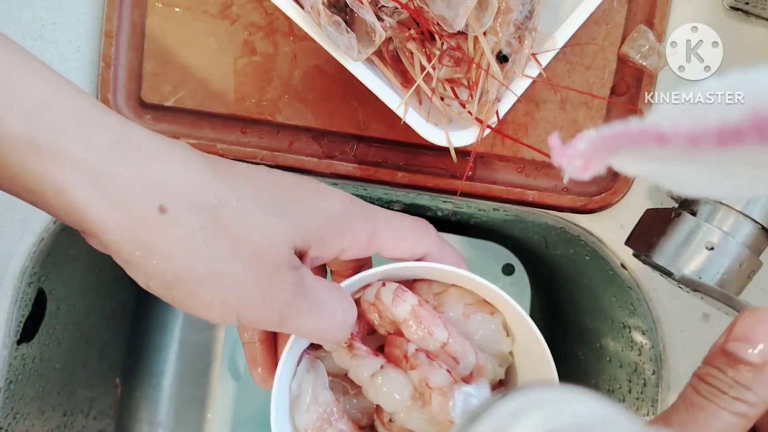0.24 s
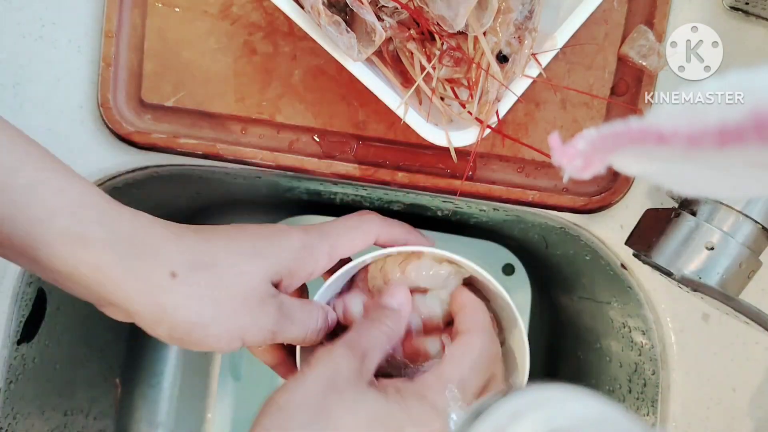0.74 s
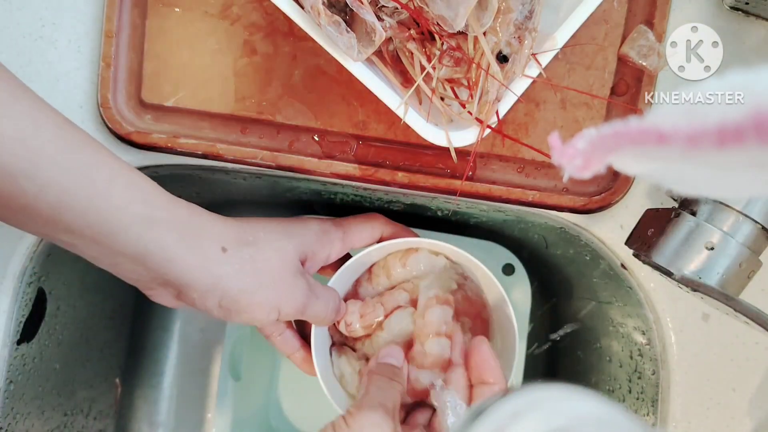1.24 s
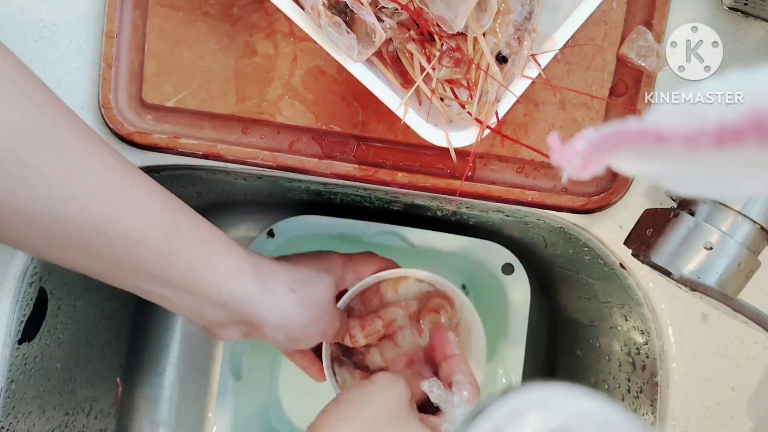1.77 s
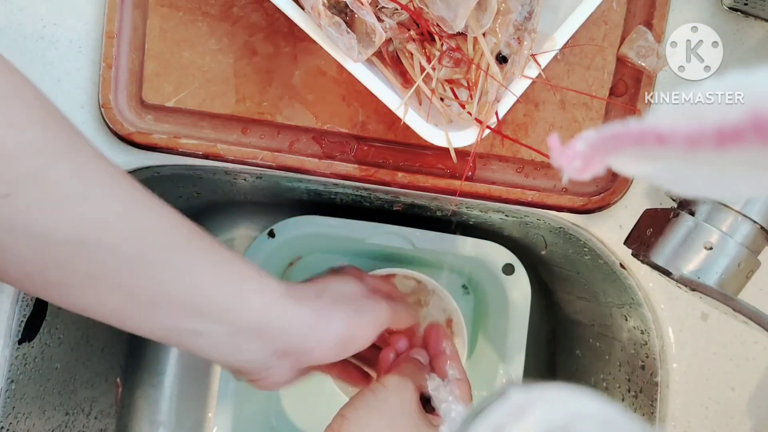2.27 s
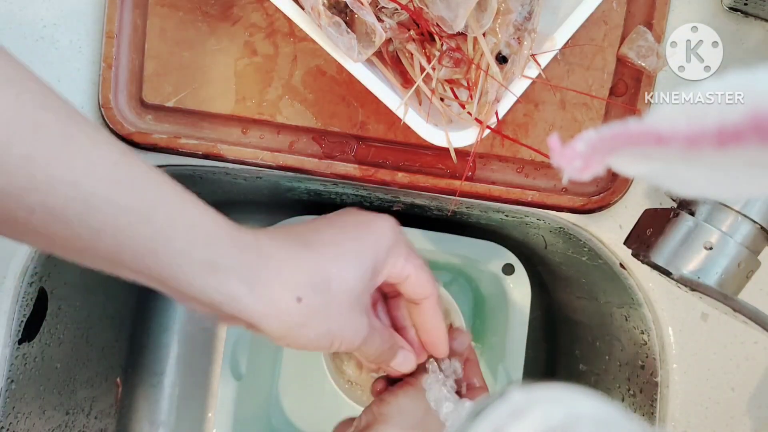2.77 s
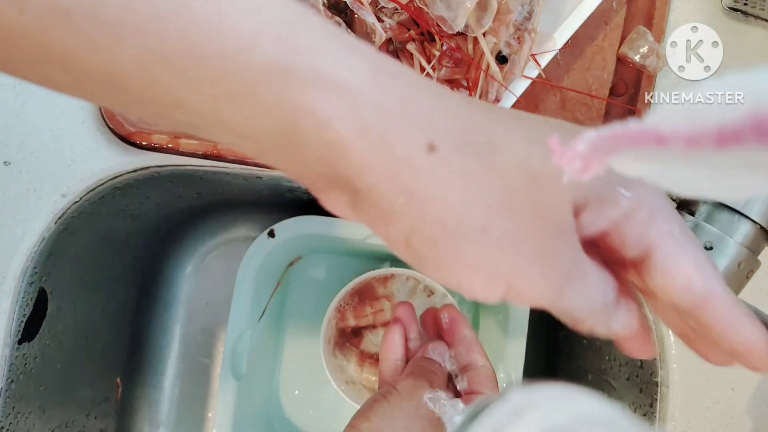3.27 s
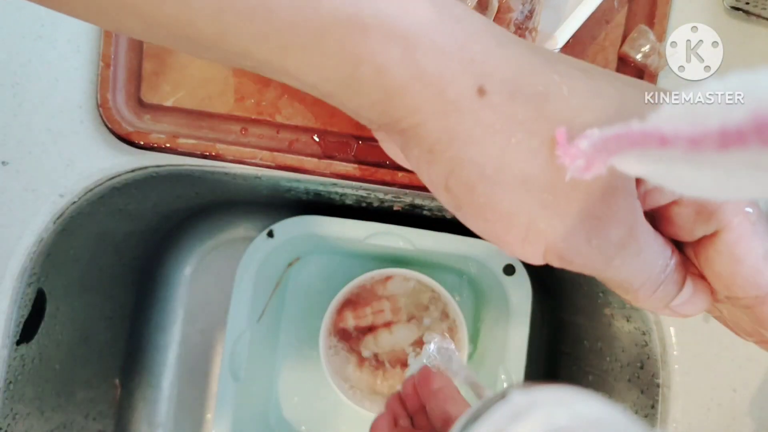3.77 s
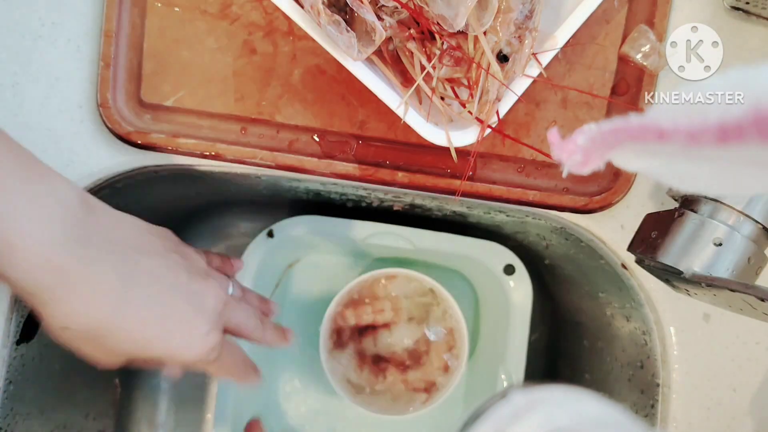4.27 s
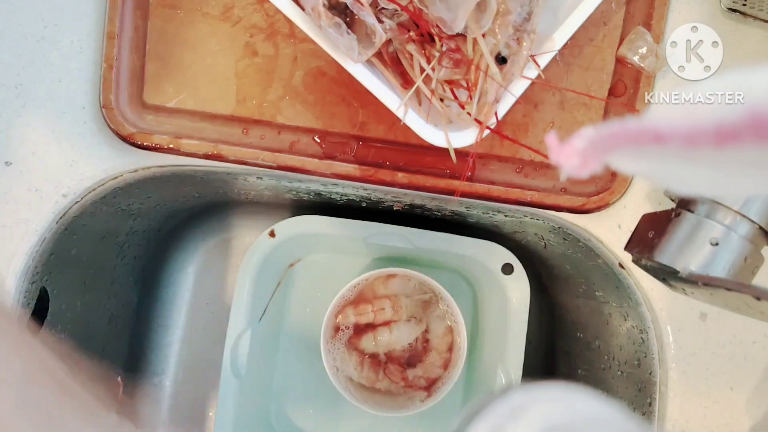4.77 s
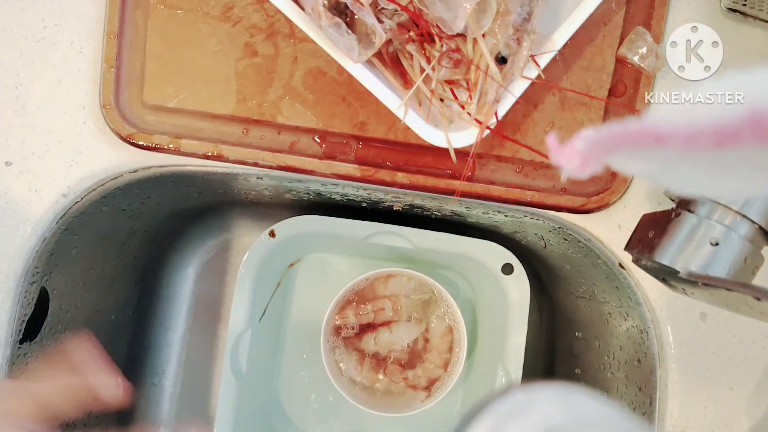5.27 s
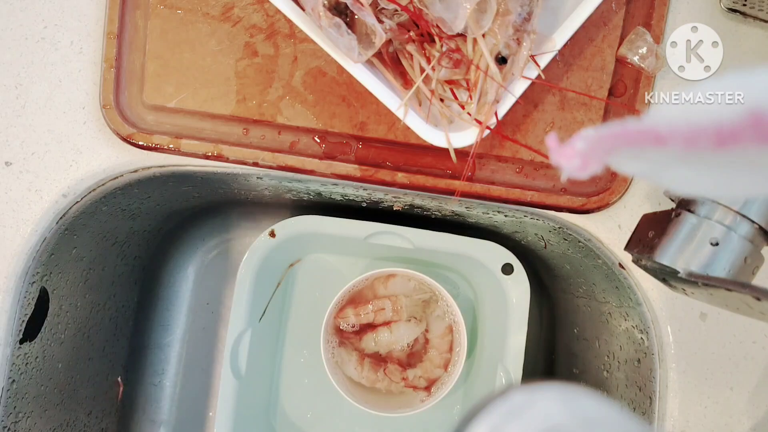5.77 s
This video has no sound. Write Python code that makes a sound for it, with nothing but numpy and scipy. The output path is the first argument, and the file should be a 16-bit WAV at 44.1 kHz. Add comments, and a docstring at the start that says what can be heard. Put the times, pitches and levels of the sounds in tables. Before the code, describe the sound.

A kitchen sink is heard close up in stereo, with a low room hum behind. At about 0.2 seconds come two soft knocks, the first with a hollow ring. From 0.5 seconds a tap runs over hands and a bowl: a broken, uneven hiss, slightly to the left, with fizzing bubbles and sharp little splashes. Between 2.1 and 2.4 seconds the bowl knocks and rocks on a plastic tub, a cluster of low, drumming blows that is the loudest moment. The water keeps splashing, with lighter bumps and a few bubbly plinks around 4 seconds, and dies away between 4.2 and 4.4 seconds. Two more light knocks follow. Wet hands are shaken off, flinging short showers of drops into the sink at about 4.5, 5.1 and 5.5 seconds. A soft knock at 5.8 seconds and a few faint drips end it.

```python
"""A kitchen sink, close up on a stereo pair, with the low hum of the room behind. A glug of air and two soft
knocks; then the tap runs over hands and a bowl in a plastic tub in the steel sink. The broken jet hisses, small
bubbles fizz and splashes ring their trapped air. The bowl knocks and rocks on the tub, which drums low, hardest
just after two seconds. The tap is shut a little after four seconds; wet hands are shaken off and a few drops
fall."""
import sys
import numpy as np
from scipy import signal
from scipy.fft import rfft, irfft, next_fast_len
from scipy.io import wavfile

SR = 44100
rng = np.random.default_rng(int(sys.argv[2]) if len(sys.argv) > 2 else 0)


def file_out(sig):
    """Save sig as 16-bit WAV at sys.argv[1]."""
    # one column per channel
    cols = np.atleast_2d(sig).T
    # limit, then scale
    lim = np.clip(cols, -1, 1)
    pcm = np.round(lim * 32767).astype(np.int16)
    wavfile.write(sys.argv[1], SR, pcm)


N = 266174

# strength of the stream as hands and bowl move through it: time_s, level_db
STREAM_FLOW = [(0.421, -79.5), (0.57, -43.5), (0.65, -44.5), (0.76, -37.5), (0.8, -40.5), (1.06, -55.5),
               (1.1, -46), (1.149, -51.5), (1.4, -37.5), (1.5, -40.5), (1.59, -33), (1.86, -38.5),
               (1.93, -43), (2.0, -36.5), (2.649, -37.5), (2.75, -51), (2.775, -37), (2.87, -35),
               (2.96, -36.5), (3.0, -40.5), (3.15, -37.5), (3.19, -45.5), (3.32, -40.5), (3.374, -48.5),
               (3.386, -36.5), (3.44, -33), (3.65, -37), (3.72, -30.5), (3.816, -45), (3.84, -31.5),
               (3.92, -34.5), (4.01, -33.5), (4.107, -40.5), (4.13, -29), (4.156, -46), (4.27, -53.5),
               (4.422, -53)]
# tone colour of the spray and its bubbles: frequency_hz, level_db
SPRAY_SPECTRUM = [(1000, -14.5), (1500, -11), (2300, -2), (3700, -5), (5300, 1), (7700, 2), (9200, -18),
                  (11000, -9.5), (15800, -12.5)]


def amp(db):
    """Decibels to gain."""
    return 10 ** (np.asarray(db) / 20)


def unit_rms(x):
    """Scale to unit rms."""
    return x / np.sqrt(np.mean(x ** 2) + 1e-20)


def at_hz(points, hz):
    """Read a table of frequency_hz, value on a log-frequency axis."""
    frequencies, values = np.transpose(points)
    return np.interp(np.log(hz), np.log(frequencies), values)


def spectrum_rms(spectrum, low_hz):
    """Rms of unit white noise shaped by a spectrum, from low_hz to 15 kHz."""
    return np.sqrt(np.sum(amp(2 * at_hz(spectrum, np.arange(low_hz, 15000, 10))) * 20 / SR))


def drift(rate_hz):
    """Random wander of unit rms, smooth above rate_hz."""
    pole = np.exp(-80 * np.pi * rate_hz / SR)
    slow = signal.lfilter([1], [1, -2 * pole, pole * pole], rng.standard_normal(N // 40 + 2002))[2000:]
    return np.interp(np.arange(N) / 40, np.arange(len(slow)), unit_rms(slow))


def ring(clicks, hz, t60_s):
    """A unit click sets a sine of height 1 ringing."""
    r, w = amp(-60 / (t60_s * SR)), 2 * np.pi * hz / SR
    return signal.lfilter([0, np.sin(w)], [1, -2 * r * np.cos(w), r * r], clicks + 1e-18)


def filtered(x, kind, hz):
    """A gentle Butterworth filter."""
    return signal.sosfilt(signal.butter(2, hz, kind, fs=SR, output="sos"), x)


def stereo_bands(noise):
    """Split noise (2 draws, mid and side, samples) into third octaves: yields centre Hz, stereo band."""
    # how alike the two microphones hear the noise: frequency_hz, correlation
    likeness = [(40, 1), (125, 0.95), (300, 0.58), (700, 0.024), (8000, 0.012)]
    edges = 35 * 2 ** (np.arange(28) / 3)
    for k, (low, high) in enumerate(zip(edges, edges[1:])):
        mid, side = filtered(noise[k % 2], "band", [low, high])
        hz = np.sqrt(low * high)
        alike = at_hz(likeness, hz)
        yield hz, np.sqrt(1 + alike) * mid + np.sqrt(1 - alike) * side * [[1], [-1]]


def gurgle_share(hz):
    """How far a pitch follows the gurgle: not at all above 4.5 kHz, fully an octave lower."""
    return np.clip(np.log2(4500 / hz), 0, 1)


def add(out, start_s, sound):
    """Mix a sound in at start_s."""
    i = round(start_s * SR)
    out[..., i:i + sound.shape[-1]] += sound[..., :out.shape[-1] - i]


def room_hum(patchy_db):
    """Room tone: a low rumble and a faint hiss, each band wavering by itself."""
    # tone colour of the room: frequency_hz, level_db
    spectrum = [(50, -54.5), (85, 2.5), (155, -4), (270, -0.5), (400, -10), (620, -8.5), (1150, -15.5),
                (2700, -27), (7800, -39.5), (9000, -60), (15800, -44)]
    bands = stereo_bands(rng.standard_normal((2, 2, N)))
    return unit_rms(sum(band * amp(at_hz(spectrum, hz) + patchy_db * drift(26)) for hz, band in bands))


def kitchen_walls(x, t60_s=0.18, wall_cut_hz=3700):
    """Near walls return the sound: eight echo loops to each microphone, duller on every round."""
    size = next_fast_len(N + SR)
    hz = np.arange(size // 2 + 1) * SR / size
    spectrum, out = rfft(x, size), np.zeros((2, N))
    for k, lag_s in enumerate(rng.uniform(0.0053, 0.033, 16)):
        loop = amp(-60 * lag_s / t60_s) / (1 + 1j * hz / wall_cut_hz) * np.exp(-2j * np.pi * hz * lag_s)
        out[k % 2] += irfft(spectrum * loop / (1 - loop), size)[:N] * (-1) ** (k // 2)
    return out


def shaken_hands(grain_db, onset_s=0.0083, first_drops_db=-3):
    """Drops flung into the sink: grainy broad noise that starts at once, swells and dies."""
    # showers of drops: start_s, peak_db, swell_s, t60_s, tilt_db_per_octave
    showers = [(4.452, -35.5, 0.067, 0.16, -2.2), (5.052, -29.5, 0.034, 0.16, -1.5),
               (5.395, -52, 0.0066, 0.78, -5.5), (5.488, -38, 0.0069, 0.21, -1.5),
               (5.6, -59, 0.12, 0.15, -3.5), (5.77, -48.5, 0.0043, 0.17, -8.5),
               (5.984, -55, 0.0077, 0.25, -3.5)]
    # tone colour of a shower before its tilt: frequency_hz, level_db
    spectrum = [(200, -18), (1100, -5.5), (2500, -8), (7200, -5.5), (9000, -10), (15800, -16.5)]
    t, envelopes, out = np.arange(N) / SR, [], 0
    for start_s, peak_db, swell_s, t60_s, tilt_db in showers:
        age = t - start_s
        swell_db = first_drops_db * np.clip(1 - age / swell_s, 0, 1)
        fall_db = 60 * np.maximum(age - swell_s, 0) / t60_s
        envelopes.append((np.clip(age / onset_s, 0, 1) ** 2 * amp(peak_db + swell_db - fall_db), tilt_db))
    for hz, band in stereo_bands(rng.standard_normal((2, 2, N)) * amp(grain_db * drift(250))):
        octaves = np.log2(max(hz, 400) / 3000)
        level = sum(envelope * amp(tilt_db * octaves) for envelope, tilt_db in envelopes)
        out += band * amp(at_hz(spectrum, hz)) * level
    return out / spectrum_rms(spectrum, 300)


def tub_and_sink(water, stifled_t60_s, rattle, sway):
    """Falling water and the bowl's blows ring the same modes; blows also thud and clack. Mid and side."""
    # blows on tub and sink: start_s, boom_db, drum_db, clack_db
    knocks = [(0.205, -43.5, -37, -70), (0.269, -37.5, -70, -75), (2.132, -10.5, -18.5, -16.5),
              (2.159, -18, -14.5, -38), (2.189, -22.5, -25.5, -19), (2.332, -21.5, -12, -19.5),
              (2.398, -32, -20, -40), (3.392, -51, -38.5, -45.5), (3.645, -48, -44, -36),
              (3.964, -39.5, -22.5, -49), (4.02, -38.5, -28, -67), (4.099, -47, -31, -75),
              (4.198, -38, -32.5, -66), (4.22, -41, -33.5, -53), (4.294, -40.5, -32, -56),
              (4.332, -48, -35.5, -51.5), (4.47, -40, -32, -34), (4.498, -40.5, -29, -46),
              (5.777, -37, -42.5, -62)]
    # where the three parts of a blow lie: boom_hz, drum_hz, clack_hz
    blow_hz = (155, 275, 1000)
    # modes of tub and sink: pitch_hz, mid_db, side_db, t60_s, gain_db_per_db of drum over boom
    modes = [(155, 0, -22, .6, 0), (274, 0, -16, .6, 0), (195, -8, -25, .15, -0.3),
             (351, -10, -18, .2, 0.1), (427, -10, -16, .15, 0.4), (520, -17, -6, .12, 0.4),
             (765, -6, -14, .11, 0.5), (930, -3, -8, .08, -0.6), (1140, -8, -3, .08, 0.3),
             (1250, -1, -3, .07, -0.1)]
    wet_share = 0.35   # share of the ring time left under falling water
    light_db, light_t60_s = -30.5, 0.074   # light blows are smothered sooner
    force, out = water * rng.standard_normal(N), np.zeros((2, N))
    for hz, mid_db, _, t60_s, _ in modes:
        out[0] += amp(mid_db) * min(1, 275 / hz) ** 2.2 * ring(force, hz, wet_share * t60_s)
    hz, mid_db, side_db, t60_s, drum_gain = np.transpose(modes)[:, :, None]
    facing = amp(np.hstack([mid_db, side_db]).T)
    facing[1, ::2] *= -1   # neighbouring modes lean to opposite sides
    t = np.arange(SR // 2) / SR
    swell = 1 - np.exp(-t * hz / 0.87)   # the walls take about a cycle to come into swing
    # the loose bowl roughens the modes, the upper ones most
    roughness = rng.standard_normal((len(knocks), len(modes), 64)) * np.where(hz > 300, rattle, sway)
    gaps_s = np.diff([row[0] for row in knocks], append=N / SR)
    free_times_s = np.minimum(0.043, 0.76 * gaps_s)   # a blow rings freely until contact stifles it
    for (start_s, *blow_db), free_s, rough in zip(knocks, free_times_s, roughness):
        boom_db, drum_db, clack_db = blow_db
        start_db = np.interp(np.log(hz), np.log(blow_hz), blow_db)
        start_db += drum_gain * np.clip(drum_db - boom_db, -10, 10)
        contact_t60_s = stifled_t60_s if max(blow_db) > light_db else light_t60_s
        fall_db = 60 * t / t60_s + 60 * np.maximum(t - free_s, 0) / contact_t60_s
        flutter = 1 + np.array([np.interp(t * 125, np.arange(64), row) for row in rough])
        ringing = amp(start_db - fall_db) * swell * flutter * np.sin(2 * np.pi * hz * t)
        burst = rng.standard_normal((2, len(t))) * (np.exp(-t / 0.0051) + 0.24 * np.exp(-t / 0.045))
        clack = amp(clack_db + 6.5) * filtered(burst, "band", [800, 3000])
        dull_noise = unit_rms(filtered(rng.standard_normal(len(t)), "band", [190, 560]))
        thud = amp(max(blow_db) - 16.5) * dull_noise * np.exp(-t / 0.047)
        add(out, start_s, facing @ ringing + thud * [[1], [0]] + clack)
    return out


def short_rings(cycles, rise, wobble):
    """Short pitched rings: each is a dying sine that climbs a little while its level wobbles."""
    # big bubbles, drops and glugs of air in the pipe: start_s, level_db, pitch_hz
    rings = [(0.202, -32, 394.5), (1.785, -33.5, 1440), (3.253, -33.5, 929), (3.309, -41.5, 915),
             (3.334, -40.5, 965), (4.05, -27.5, 1050), (4.083, -23, 1986), (5.072, -27, 1072),
             (5.785, -31, 616), (5.9, -42.5, 2500)]
    out, t = np.zeros(N), np.arange(round(0.15 * SR)) / SR
    for (start_s, level_db, hz), chance in zip(rings, rng.standard_normal((len(rings), 32))):
        flutter = 1 + wobble * np.interp(t * 200, np.arange(32), chance)
        envelope = amp(level_db - 60 * t * hz / cycles) * np.minimum(t / 0.0013, 1)
        add(out, start_s, envelope * flutter * np.sin(2 * np.pi * hz * t * (1 + rise * t)))
    return out


def fizz(gurgle_db, per_s, cycles, clump_db):
    """Small bubbles ring some cycles each; those of like size are born in clumps."""
    strengths = amp(4.2 * np.minimum(rng.exponential(1, N), 4.5)) * rng.choice([-1, 1], N)
    dice, size_class, out = rng.random(N), rng.integers(0, 30, N), 0
    clumps = [amp(clump_db * drift(15)) for _ in range(10)]
    for k, hz in enumerate(np.geomspace(1300, 11000, 30)):
        born = (size_class == k) * (dice < per_s * clumps[k // 3] / SR)
        level_db = gurgle_share(hz) * gurgle_db + at_hz(SPRAY_SPECTRUM, hz) + 4.1 * np.log2(hz / 5000)
        out += amp(level_db) * ring(strengths * born, hz, cycles / hz)
    return unit_rms(out)


def stray_splashes(flow_db, per_s=70, trickle_db=-50):
    """A stream above a trickle throws lesser splashes at random: rows of start_s, peak_db, pitch_hz."""
    open_s, shut_s = STREAM_FLOW[0][0], STREAM_FLOW[-1][0]
    when, size, pitch = rng.random((round(per_s * (shut_s - open_s)), 3)).T
    start_s = open_s + (shut_s - open_s) * when
    around_db = flow_db[(start_s * SR).astype(int)]
    peak_db = around_db + 9.5 - 2.5 * np.log(size + 0.08)
    return np.transpose([start_s, peak_db, 2700 * 4 ** pitch])[around_db > trickle_db]


def splashes(flow_db, spatter_s, tail_s, cycles):
    """Each splash: uneven ticks, a hissing tail, an air pocket that rings and a bubble that chirps."""
    # hard splashes and their trapped air: start_s, peak_db, pitch_hz
    hard = [(0.5686, -22.5, 7840), (0.6809, -28.5, 3323), (0.6945, -20, 5260), (0.7262, -25, 3660),
            (0.7725, -17.5, 2640), (0.8568, -25.5, 2670), (1.088, -31, 5300), (1.3848, -15.5, 5690),
            (1.472, -24, 2637), (1.5663, -21.5, 2665), (1.5906, -14.5, 5600), (1.6851, -27, 2320),
            (1.709, -18.5, 5275), (1.763, -22.5, 9900), (1.8027, -13.5, 5400), (1.845, -23, 5240),
            (1.981, -22, 2395), (2.1947, -15.5, 4950), (2.4938, -24.5, 2760), (2.6016, -16.5, 7300),
            (3.0654, -19, 2075), (3.0898, -20, 2380), (3.2872, -21, 5840), (3.3827, -33, 6000),
            (3.457, -18.5, 4330), (3.5398, -17.5, 5100), (3.6458, -19.5, 2980), (3.716, -21.5, 2420),
            (3.9363, -12, 5760), (3.9998, -18, 3060), (4.05, -24, 3080), (4.087, -17, 6900),
            (4.1303, -18.5, 2350), (4.189, -21.5, 10900), (4.2886, -24.5, 6480), (4.346, -35, 7100),
            (5.4116, -39, 2300), (5.5194, -32, 5600)]
    out, t = np.zeros(N), np.arange(round(0.12 * SR)) / SR
    for k, (start_s, peak_db, hz) in enumerate([*hard, *stray_splashes(flow_db)]):
        top_hz = min(hz * (4.0 if k < len(hard) else 2.2), 16000)   # strays are duller
        ticks = np.repeat(rng.random(len(t) // 20 + 1) ** 2, 20)[:len(t)]   # about 0.5 ms a droplet
        ticks[:20] = 1.6   # the first droplet lands hardest
        pace = t * np.sqrt(hz / 5000)   # small splashes are over sooner
        envelope = ticks * np.exp(-pace / spatter_s) + 0.22 * np.exp(-pace / tail_s)
        burst = rng.standard_normal(len(t)) * envelope
        pocket = ring(burst * hz / 20000, hz, cycles / hz)
        chirp = amp(-60 * t * hz / (2 * cycles)) * np.sin(2 * np.pi * 1.24 * hz * t * (1 + 14 * t))
        droplets = filtered(0.37 * burst + pocket, "band", [0.68 * hz, top_hz])   # all of like size
        sound = droplets + 0.1 * burst + 0.12 * chirp
        add(out, start_s, amp(peak_db) * sound / np.abs(sound).max())
    return out


def spray(flow_db, gurgle_db, patchy_db, spatter_db, full_flow_db=-27.5, mist_hz=9000):
    """The broken jet hisses: like droplets come in quick volleys; lower bands swell with the gurgle."""
    # how much louder the jet is at the left microphone: frequency_hz, level_db
    left_bias = [(1000, -5.5), (2500, -2), (5000, 6), (9000, -0.5)]
    mist_db = 0.34 * np.clip(full_flow_db - flow_db, -5, 15)   # fine mist follows the flow only in part
    octave_volleys = [unit_rms(amp(spatter_db * np.clip(drift(110), 0, 3) ** 1.5)) for _ in range(9)]
    out = 0
    for k, (hz, band) in enumerate(stereo_bands(rng.standard_normal((2, 2, N)))):
        level_db = at_hz(SPRAY_SPECTRUM, hz) + gurgle_share(hz) * gurgle_db + (hz > mist_hz) * mist_db
        pan_db = at_hz(left_bias, hz) / 2 * np.array([[1], [-1]])
        out += band * octave_volleys[k // 3] * amp(level_db + pan_db + patchy_db * drift(11.6))
    return out / spectrum_rms(SPRAY_SPECTRUM, 4000)


def scene():
    """Stream, tub, drops and room, placed between the two microphones."""
    # gurgle against the spray: time_s, level_db
    gurgle = [(0.5, 13), (0.6, -5.5), (0.85, 5.5), (1.5, 0.5), (2.9, -4), (3.7, -5), (4.12, 5.5),
              (4.18, -30)]
    t = np.arange(N) / SR
    flow_db = np.interp(t, *np.transpose(STREAM_FLOW))
    gurgle_db = np.interp(t, *np.transpose(gurgle))
    open_s, shut_s = STREAM_FLOW[0][0], STREAM_FLOW[-1][0]
    stream = np.clip((t - open_s) / 0.016, 0, 1) * np.clip((shut_s - t) / 0.07, 0, 1) * amp(flow_db)
    bubbles = amp(-4.5) * stream * fizz(gurgle_db, per_s=760, cycles=60, clump_db=5.5)
    splashing = bubbles + splashes(flow_db, spatter_s=0.0028, tail_s=0.015, cycles=17.4)
    tub_mid, tub_side = tub_and_sink(amp(-46) * stream, stifled_t60_s=0.25, rattle=1.0, sway=0.32)
    centre = tub_mid + short_rings(cycles=72, rise=0.5, wobble=0.89)
    hiss = amp(-5.5) * stream * spray(flow_db, gurgle_db, patchy_db=3.0, spatter_db=2.5)
    drops = shaken_hands(grain_db=1.5)
    direct = splashing * amp([[1.5], [-1.5]]) + centre + tub_side * [[1], [-1]] + hiss + drops
    echoes = amp(-6) * kitchen_walls(splashing) + amp(-8) * kitchen_walls(filtered(centre, "high", 400))
    return direct + echoes + amp(-49) * room_hum(patchy_db=2.5)


def record(dry):
    """The microphones' signal with a gentle bass cut and a steep cut of the very top."""
    top_cut = signal.ellip(10, 0.5, 70, 15450, fs=SR, output="sos")
    return signal.sosfilt(top_cut, filtered(dry, "high", 45))


dry = scene()
out = record(dry)
file_out(out)
```